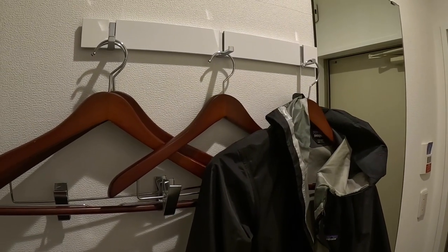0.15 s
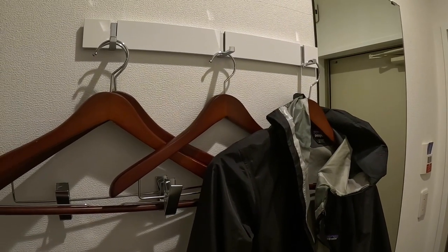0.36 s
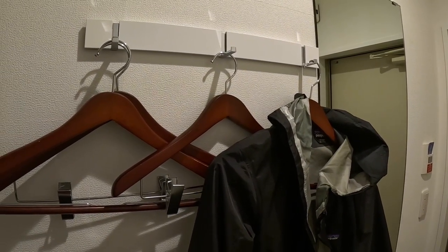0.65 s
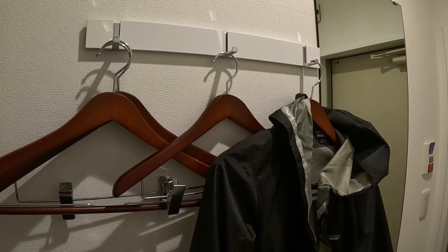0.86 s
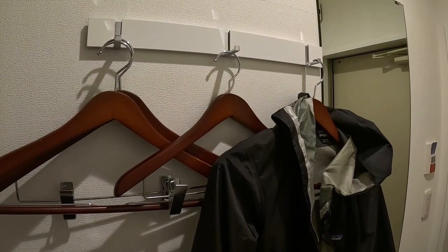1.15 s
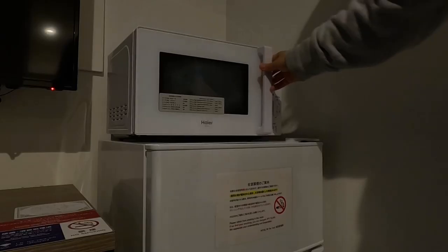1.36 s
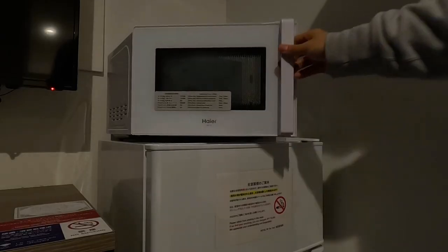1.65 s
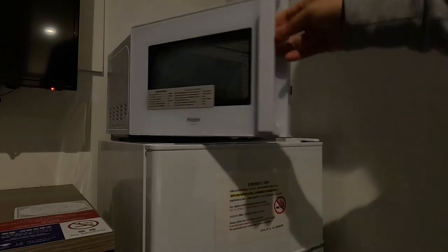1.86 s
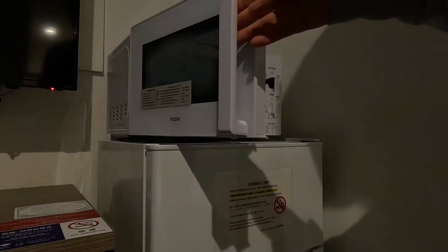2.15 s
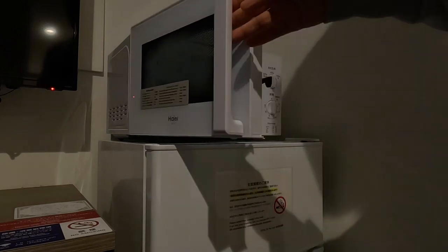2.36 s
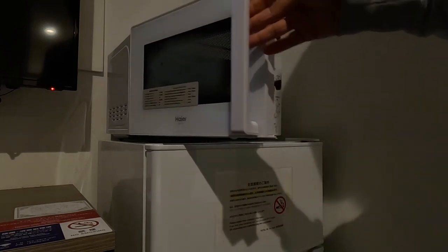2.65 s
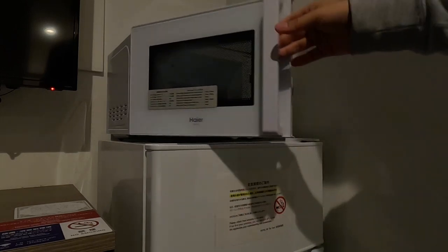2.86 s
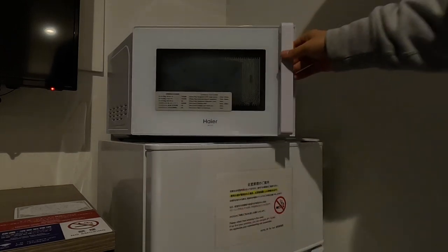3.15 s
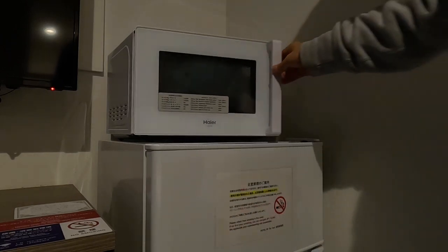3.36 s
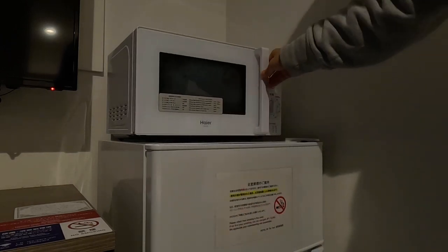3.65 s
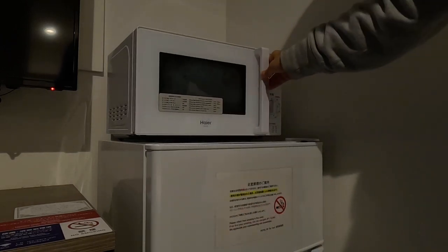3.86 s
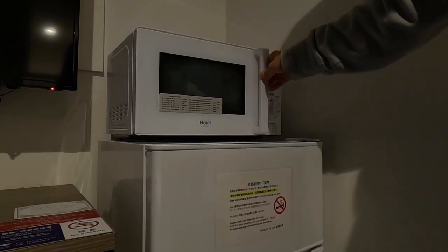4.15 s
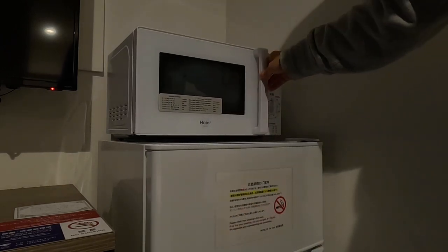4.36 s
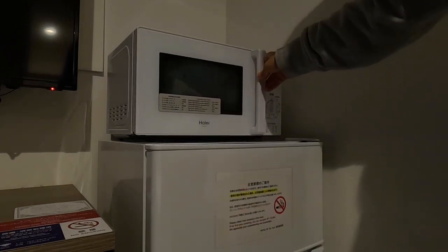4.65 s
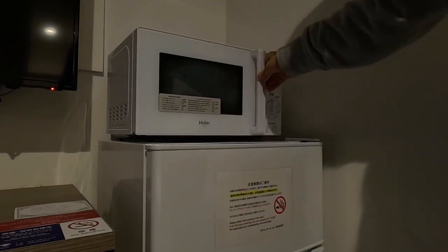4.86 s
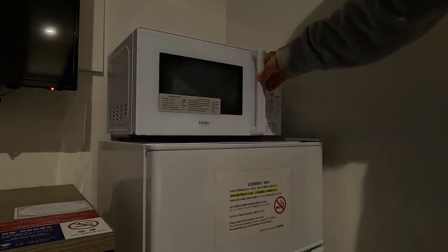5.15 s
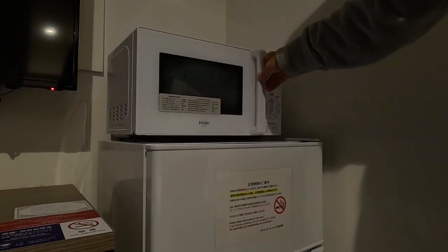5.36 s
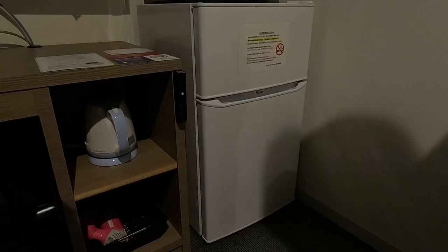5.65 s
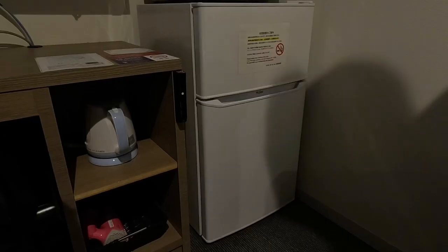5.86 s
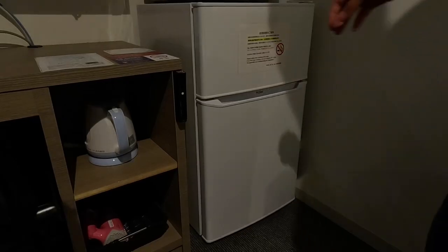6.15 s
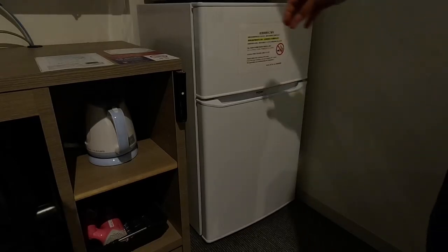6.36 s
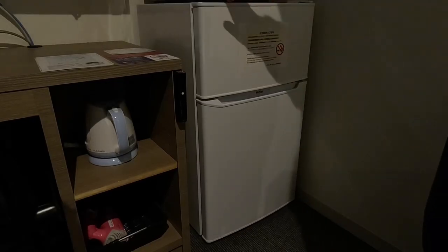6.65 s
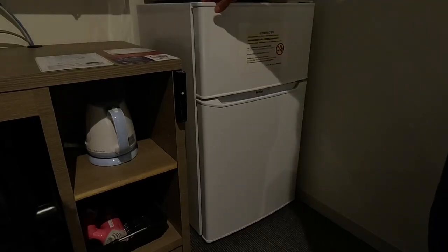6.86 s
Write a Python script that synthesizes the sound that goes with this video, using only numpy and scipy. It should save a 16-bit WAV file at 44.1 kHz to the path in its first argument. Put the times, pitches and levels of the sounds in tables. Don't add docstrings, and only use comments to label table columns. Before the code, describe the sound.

A small, bare room filled with low, unsteady ventilation rumble. After a moment of only air, a microwave door on a fridge unlatches with a hard plastic clunk and faint springy ringing. Hand and sleeve rub softly, the door meets its stop, gets a nudge, then shuts with a sharp snap and heavy slam. Finally, soft finger taps and a palm slide on the fridge top. Close stereo microphone.

```python
import sys
import numpy as np
from scipy import signal
from scipy.fft import rfft, irfft, next_fast_len
from scipy.io import wavfile
from scipy.ndimage import uniform_filter1d

SR = 44100
rng = np.random.default_rng(int(sys.argv[2]) if len(sys.argv) > 2 else 0)


def wrap_up_sound(samples):
    columns = np.atleast_2d(samples).T
    tamed = np.clip(columns, -1, 1)
    steps = np.round(tamed * 32767).astype(np.int16)
    wavfile.write(sys.argv[1], SR, steps)


def ratio(d):
    e = np.asarray(d, float) / 20
    return 10 ** e


N = 309141
T = np.arange(N) / SR


# f/Hz, level/dB, T60/s
CASING = [(101.35, -23.5, 1), (120.3, -16.5, .45), (160.8, -15.5, 0.6), (167.4, -8.5, 0.26),
          (208.3, -24.5, 0.79), (235.2, -21.5, 0.33), (268.4, -15.5, 0.59), (314, -11, 0.2),
          (340.5, -13.5, 0.4), (401, -26, 0.72), (496, -28, 0.6), (536, -30, 0.75), (720, -35, 0.26)]
# f/Hz, level/dB, T60/s
SPRINGS = [(156, -44, 2.2), (297, -58, 5.0), (595, -52, 1.5), (884, -51, 1.4), (969, -58, 1.1),
           (1179, -64, 4.5), (1474, -53, 1.1), (1630, -57, 1.15), (2234, -58, 1.05), (3155, -64, 1.0),
           (3784, -68, 1.0), (4836, -60, 1.1)]
# f/Hz, level/dB, T60/s
PANELS = [(153, -38, 1.6), (297, -42, 4.5), (645, -43, .8), (1179, -60, 1.5), (1470, -50, 1.0),
          (1631, -47, .95), (3404, -45, .5), (3558, -62, .6), (3725, -53, .56), (3965, -49, .45),
          (4288, -56, .65), (4838, -55, .7)]
# f/Hz, level/dB, T60/s
TRAY = [(454, -42, .35), (2281, -70, .4), (1950, -72, .3)]
# f/Hz, level/dB
NEAR = [(100, -11.5), (300, -10), (800, 0.5)]
# f/Hz, level/dB, T60/s
LATCH_RING = [(1600, -23, 0.013), (3570, -21, 0.0084), (5450, -27, .008)]
# f/Hz, level/dB, T60/s
HOOK_RING = [(1701, -25, 0.0098), (3580, -24.5, .012)]
# f/Hz, level/dB, T60/s
STOP_RING = [(940, -28.5, .025), (1190, -26, .04), (1400, -20, .02), (2410, -30.5, .015)]
# f/Hz, level/dB, T60/s
NUDGE_RING = [(300, -24, .05), (1660, -32.5, .012), (3420, -33, 0.0092), (3980, -26.5, 0.01),
              (4263, -32, 0.015), (6960, -35, .012)]
# f/Hz, level/dB, T60/s
SNAP_RING = [(1100, -23.5, 0.019), (1711, -29, .02), (3455, -28, .015)]
# f/Hz, level/dB per Hz
LATCH = [(59, -34.5), (100, -5.5), (140, 3.5), (233, -10.5), (333, -2.5), (476, -16), (640, -6.5),
         (790, -16), (936, -11), (1690, -12.5), (2800, -13.5), (3610, -16), (4370, -14), (7720, -25),
         (15500, -61.5)]
# f/Hz, level/dB per Hz
HOOK = [(180, -33), (300, -4.5), (1560, -6.5), (1810, -14.5), (1940, -8), (2210, -15.5), (7130, -11),
        (12100, -24), (15500, -52)]
# f/Hz, level/dB per Hz
STOP = [(120, -36.5), (200, -7.5), (239, 5), (486, -22), (561, -32.5), (800, -13.5), (1410, -9),
        (2450, -23), (3200, -28.5), (5860, -28), (9300, -43.5), (14000, -67)]
# f/Hz, level/dB per Hz
NUDGE = [(71, -45), (120, -12.5), (159, -1), (246, -15), (300, -8), (652, -29.5), (720, -25.5), (1600, -24),
         (2200, -27.5), (3990, -30), (5170, -32.5), (7260, -32), (14000, -62)]
# f/Hz, level/dB per Hz
SNAP = [(240, -33), (400, -0.5), (683, -14), (1110, -0.5), (3060, -11.5), (3510, -8), (5820, -11.5),
        (9780, -22.5), (15500, -50.5)]
# f/Hz, level/dB per Hz
SLAM = [(41, -24), (70, -12), (103, -4), (242, -13.5), (278, -10), (572, -22), (640, -11.5), (717, -18.5),
        (940, -19.5), (2030, -28), (5000, -43), (9420, -57), (15500, -78)]
# f/Hz, level/dB per Hz
TICK = [(470, -34.5), (800, -3.5), (1480, -1.5), (2500, -12), (2790, 1), (3080, -13), (3360, -4.5),
        (5420, -5), (15000, -35.5)]
# (t/s, level/dB, rattle/ms, blow on the casing level/dB, ringing level/dB)
LATCHING = [
    (HOOK, HOOK_RING, "open", [(1.355, -46.5, 13, -31.5, -60.5), (1.378, -32, 14, -28, -49.5)]),
    (LATCH, LATCH_RING, "open", [(1.4062, -15.5, 5.8, -23, 3), (1.45, -37.5, 5, -23.5, -29)]),
    (STOP, STOP_RING, "open", [(3.068, -40, 10.6, -47, -18.5), (4.61, -52, 12, -54, -58)]),
    (NUDGE, NUDGE_RING, "shut", [(3.7235, -32.5, 5.6, -25.5, -25)]),
    (SNAP, SNAP_RING, "shut", [(4.625, -36.5, 6.9, -65.5, -55.5), (4.6325, -17, 6.2, -40, -54.5)]),
    (SNAP, [], "shut", [(4.643, -2.5, .5, -52, -62)]),
    (SLAM, [], "shut", [(4.645, -12.5, 7, -1, 0.5)]),
    (STOP, [], "tray", [(4.9, -58, 19, -64, -1)]),
]
TOUCHES = [
    (TICK, [], "open", [(1.666, -57, 11, -69, -26), (1.73, -62.5, 11, -72, -29), (1.782, -57.5, 8.2, -47, -35), (1.913, -63, 9.7, -46, -25), (3.32, -47, 1.6, -69, -45), (4.532, -50, 4.9, -36.5, -56.5), (6.413, -66, 3.6, -69, -69), (6.9, -56, 0.9, -63, -75.5)]),
    (TICK, [], "fridge", [(6.572, -64, 2.7, -37.5, -52), (6.905, -70, 10, -48, -44), (6.917, -71, 4.9, -67, -24)]),
]


def door(push_s=0.0003):
    near, far, body = np.zeros((3, N))
    push = T[:400] * np.exp(-T[:400] / push_s)
    casing = np.convolve(ring(CASING)[:SR], push / push.sum())
    casing = band(casing, 100, 4400)
    straight = causal(NEAR)
    rings = {"open": ring(SPRINGS), "shut": ring(PANELS), "tray": ring(TRAY),
             "fridge": band(casing, 73, 159)}
    for points, parts, state, rows in LATCHING + TOUCHES:
        shape = causal(points) + ring(parts, count=2048)
        for s, db, rattle_ms, casing_db, ring_db in rows:
            contact = ratio(db) * signal.fftconvolve(chatter(rattle_ms), shape)
            add(near, signal.fftconvolve(contact, straight), s)
            add(far, ratio(room_drive_db(rattle_ms)) * contact, s)
            add(body, ratio(casing_db) * casing, s)
            add(body, ratio(ring_db) * rings[state], s)
    return near, far, body


def room_drive_db(rattle_ms, full_ms=6.3, halving_db=-3.5):
    halvings = np.log2(full_ms / max(rattle_ms, .3))
    return halving_db * max(halvings, 0)


def chatter(rattle_ms, rough_db=1.5, rise_ms=0.27, count=4096):
    level_noise, x = rng.standard_normal((2, count))
    t_ms = 1000 * T[:count]
    grain = unit(uniform_filter1d(level_noise, size=24))
    decay = np.exp(-t_ms / max(rattle_ms, .3))
    rise = 1 - np.exp(-t_ms / rise_ms)
    fade = ratio(rough_db * grain) * decay * rise
    for _ in range(5):
        envelope = uniform_filter1d(np.abs(x), size=24) + 1e-9
        lines = rfft(x / envelope * fade)
        x = irfft(lines / np.abs(lines))
    return x * np.sqrt(np.sum(fade ** 2))


def ring(modes, count=2 * SR):
    t = T[:count]
    return sum(ratio(db - 60 * t / t60) * np.sin(2 * np.pi * hz * t) for hz, db, t60 in modes)


CLOTH = {"hand on the door": (-7.5, 11, [(1.6, -65, .05, 0.3), (1.676, -55, 0.022, 0.12),
         (1.79, -56.5, 0.029, 0.081), (1.858, -59.5, 0.023, .08), (1.925, -58, 0.049, 0.096),
         (1.98, -64.5, 0.045, .2)]), "sleeve": (2.3, 8, [(2.2, -83.5, 0.28, 0.78), (3.05, -70, 0.18, 0.083),
         (3.18, -73, 0.12, 0.26), (3.36, -70, 0.19, 0.36), (3.71, -68, .03, 0.055),
         (3.934, -74.5, .04, .12), (4.14, -83, .2, 0.87), (4.52, -75.5, .06, 0.17)]),
         "reaching arm": (7, -1.8, [(6.055, -76, 0.089, 0.23), (6.22, -79, 0.25, 0.37),
         (6.8, -88, 0.088, 0.59)]), "palm sliding": (-7.5, -5, [(6.612, -53, 0.062, 0.087),
         (6.72, -71.5, .1, 0.37)]), "fingers on the fridge": (0, -6, [(6.355, -61, 0.063, 0.1),
         (6.415, -57, .02, .04), (6.562, -60, 0.013, .1), (6.585, -54, 0.028, 0.072),
         (6.905, -67, 0.013, 0.1)])}


def cloth(rough_db=1.5):
    grain = ratio(rough_db * walk(300) + 0.35 * walk(86) + 1.8 * walk(25))

    def hiss(lo_hz, hi_hz):
        return unit(band(rng.standard_normal(N), lo_hz, hi_hz, order=2) * grain)

    dull, bright, scuff = hiss(1306, 3400), hiss(4400, 8360), hiss(350, 1500)
    out = 0
    for bright_db, scuff_db, rows in CLOTH.values():
        power = 0
        for s, db, swell_s, fade_s in rows:
            before, after = (s - T) / max(swell_s, .002), (T - s) / max(fade_s, .002)
            power = power + ratio(db - 20 * np.maximum(before, after)) ** 2
        hisses = dull + bright * ratio(bright_db) + scuff * ratio(scuff_db)
        out = out + np.sqrt(power) * ratio(-7) * hisses
    return out


# f/Hz, T60/s
ROOM_T60 = [(100, 0.66), (400, 0.65), (1000, 0.43), (3000, 0.39), (6000, 0.21), (12000, 0.2)]


def room(x, level_db=3, gap_s=0.0017):
    t, tail = T[:SR], 0
    table_hz, table_t60 = np.transpose(ROOM_T60)
    for hz in 63 * 2. ** np.arange(8.1):
        t60 = np.interp(np.log(hz), np.log(table_hz), table_t60)
        fade = ratio(-60 * t / t60) * np.clip(t / gap_s - 1, 0, 1)
        noise = band(rng.standard_normal((2, SR)), hz / 2 ** .5, hz * 2 ** .5, order=2)
        tail = tail + noise * fade / np.sqrt(np.sum(fade ** 2))
    lines = rfft(tail, 2 * SR)
    even = np.sqrt(uniform_filter1d(np.abs(lines) ** 2, size=500, axis=1))
    tail = irfft(lines / even * np.median(even))[:, :SR]
    return ratio(level_db) * signal.fftconvolve(x[None], ports(*tail), axes=1)[:, :N]


# f/Hz, level/dB per Hz
AIR = [
    [(35, -34), (60, -4.5), (95, -2), (155, -14), (182, -19.5), (257, -16.5), (289, -27), (408, -23),
     (514, -34), (564, -33.5), (1130, -39.5), (1960, -53.5), (11400, -71), (15000, -82)],
    [(35, -35.5), (60, -4.5), (87, -12.5), (186, -18), (251, -24.5), (302, -28), (332, -29), (711, -42.5),
     (780, -43), (960, -48), (1210, -43.5), (2530, -65.5), (9450, -70), (15000, -82.5)],
    [(35, -30), (60, 6), (123, -3.5), (162, 3), (224, -7.5), (263, -1), (282, -10.5), (332, -12.5),
     (762, -25), (835, -24.5), (3190, -46.5), (6090, -44.5), (9450, -46.5), (15000, -57)],
]
AIR_DB = [
    -45.5,
    -47.5,
    -56,
]


def air():
    out = 0
    for k, points in enumerate(AIR):
        noise = colour(rng.standard_normal((2, N)), points)
        noise *= ratio(AIR_DB[k]) / noise[0].std()
        out = out + noise * spot(k)
    low = colour(out, [(200, 3), (400, -59.5)])
    top = colour(out, [(1200, -60.5), (2400, -1.5)])
    middle = out - low - top
    low = low * ratio(0.62 * drive() + .8 * walk(4))
    middle = middle * ratio(.2 * drive() + .5 * walk(2.5))
    top = top * ratio(1.0 * walk(1.9))
    return ports(*(low + middle + top))


# low edge f/Hz, high edge f/Hz, level/dB at each spot
BOOMS = [
    (25.22, 36, [-36, -42.5, -47]),
    (47, 63, [-57.5, -44.5, -57.5]),
]


def rumble(throb_db=2, throb_hz=6):
    out = 0
    for lo_hz, hi_hz, spots_db in BOOMS:
        noise = rng.standard_normal((2, N + SR))
        x = unit(band(noise, lo_hz, hi_hz, order=2)[:, SR:])
        envelope = np.abs(signal.hilbert(x, next_fast_len(N))[:, :N])
        x = unit(x / (envelope + 1.5))
        here = sum(ratio(db) * spot(k) for k, db in enumerate(spots_db))
        out = out + x * here * ratio(drive() + throb_db * walk(throb_hz))
    return ports(*out)


# t/s, level/dB
DRIVE = [(0, 5.5), (.3, -1.5), (.6, 3), (1.0, 1), (1.3, 0), (1.9, -3.5), (2.2, 2), (2.55, -1), (2.85, 0),
         (3.3, 1), (3.8, -1), (4.4, 4.5), (4.95, -2), (5.58, 3), (5.63, -7.5), (6.2, 2), (6.8, 4.5),
         (7.0, 4)]


def drive():
    return np.interp(T, *np.transpose(DRIVE))


CUTS_S = [
    0,
    1.354,
    5.606,
    7.1,
]


def spot(k):
    here = 1. * (T >= CUTS_S[k]) * (T < CUTS_S[k + 1])
    return uniform_filter1d(here, size=200, mode="nearest")


def add(track, x, s):
    i = int(s * SR)
    next_cut = min(c for c in CUTS_S if c > s)
    end = min(i + len(x), N, int(SR * next_cut))
    release = np.minimum(np.arange(end - i, 0, -1) / 300, 1)
    track[i:end] += x[:end - i] * release


# f/Hz, level/dB
SIDE_SHARE = [(30, -33), (125, -24), (250, -16), (500, -10), (1000, -8.5), (2000, -4.5), (4000, -6.5),
              (8000, -10), (15000, -6)]


def ports(mid, side):
    side = colour(side, SIDE_SHARE)
    return np.array([mid + side, mid - side])


def unit(x):
    return x / np.sqrt(np.mean(x ** 2))


def gain(points, count):
    hz, db = np.transpose(points)
    line_hz = np.fft.rfftfreq(count, 1 / SR)
    return ratio(np.interp(np.log(line_hz + 1), np.log(hz), db))


def colour(x, points):
    count = next_fast_len(x.shape[-1])
    return irfft(rfft(x, count) * gain(points, count), count)[..., :x.shape[-1]]


def causal(points, count=4096):
    c = irfft(np.log(gain(points, count) + 1e-5))
    c[1:count // 2] *= 2
    c[count // 2 + 1:] = 0
    h = irfft(np.exp(rfft(c)))[:count // 2]
    return h / np.sqrt(np.sum(h ** 2))


def band(x, lo_hz, hi_hz, order=3):
    edges_hz = [lo_hz, min(hi_hz, .45 * SR)]
    return signal.sosfilt(signal.butter(order, edges_hz, "band", fs=SR, output="sos"), x)


def walk(rate_hz):
    k = int(SR / rate_hz)
    held = np.repeat(rng.standard_normal(N // 50)[:N // k + 1], k)
    slewed = uniform_filter1d(uniform_filter1d(held, k), k)
    return unit(slewed[:N])


def scene():
    near, far, body = door()
    rub = cloth()
    echoes = room(far + ratio(-7) * rub)
    ringing = ports(body, np.roll(body, 40) * ratio(-12))
    return near + rub + echoes + ringing + air() + rumble()


def band_limit(x):
    return signal.sosfilt(signal.butter(12, 15630, fs=SR, output="sos"), x)


# f/Hz, level/dB
PORT_LAG = [(50, 1), (2500, 5), (7000, -5)]


def record(dry):
    slope = colour(np.gradient(dry.mean(axis=0)), PORT_LAG) / 2
    lagged = dry + np.array([-slope, slope])
    low_pass = signal.ellip(8, .2, 40, 15600, fs=SR, output="sos")
    return band_limit(signal.sosfilt(low_pass, lagged))


dry = scene()
out = record(dry)
wrap_up_sound(out)
```